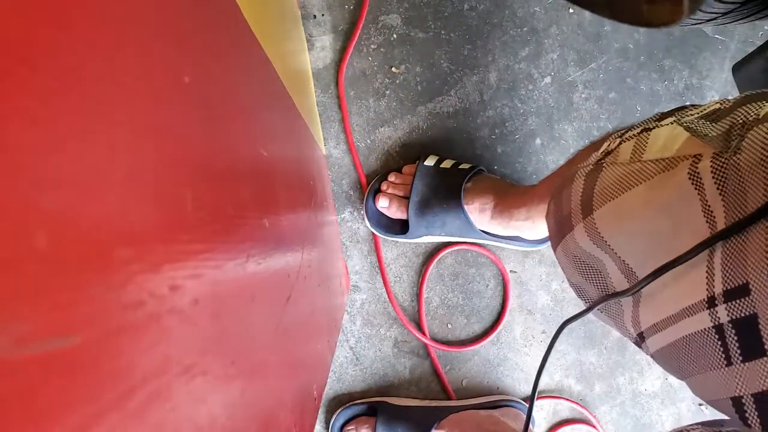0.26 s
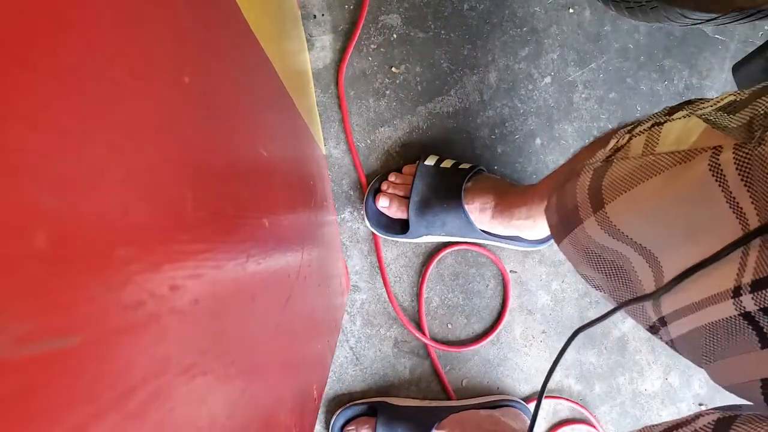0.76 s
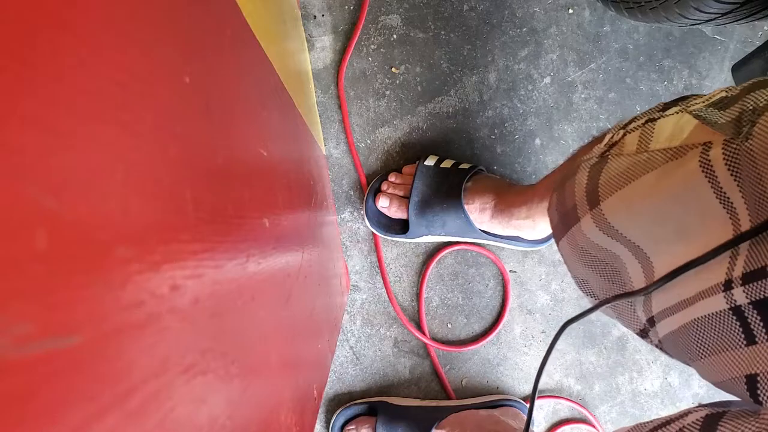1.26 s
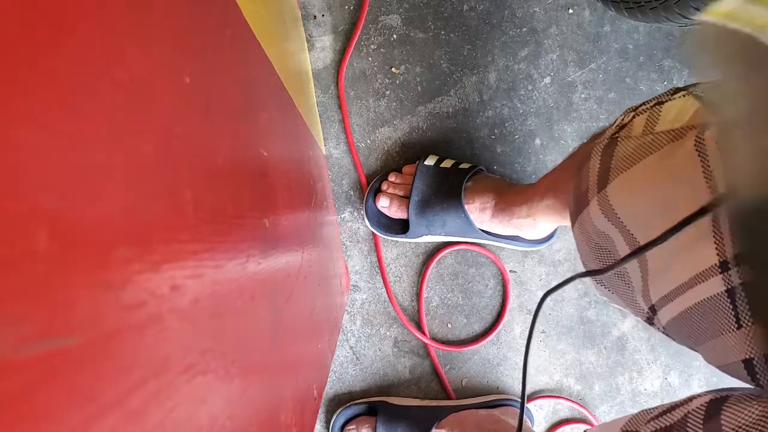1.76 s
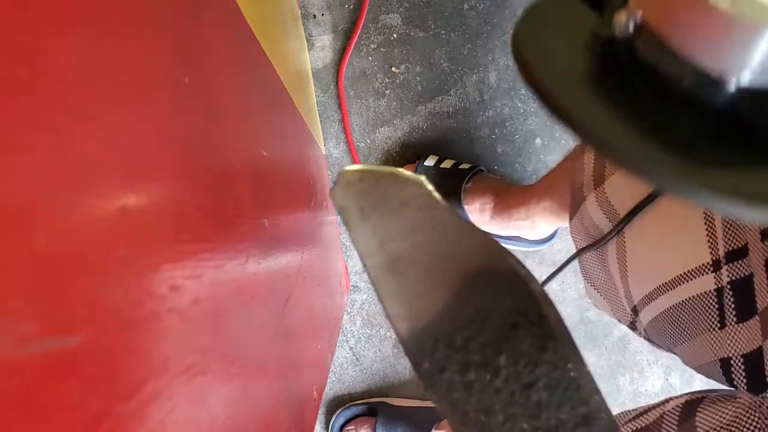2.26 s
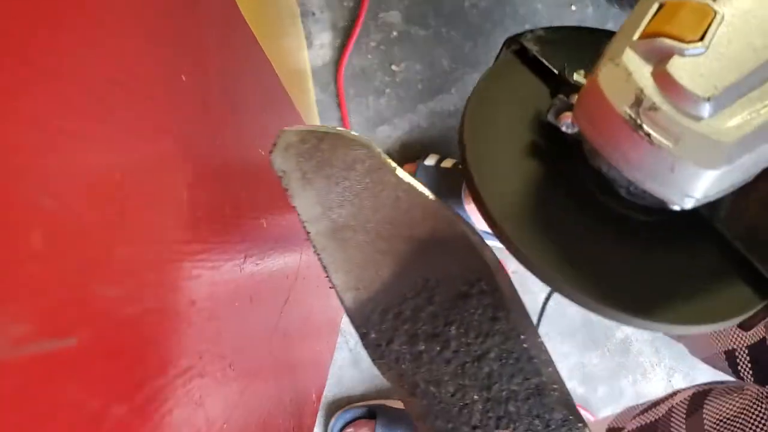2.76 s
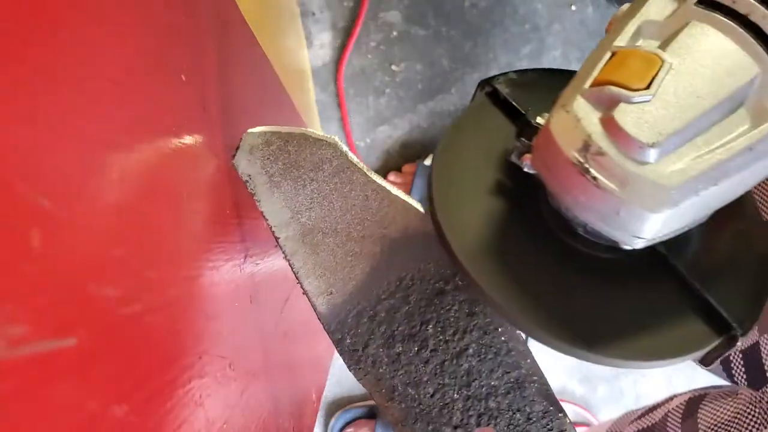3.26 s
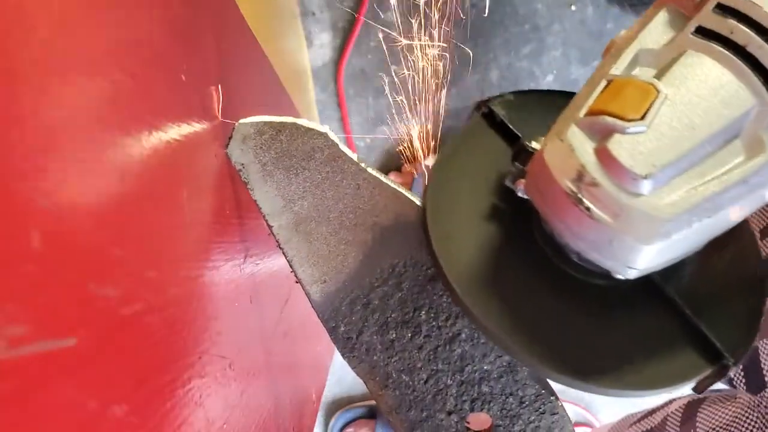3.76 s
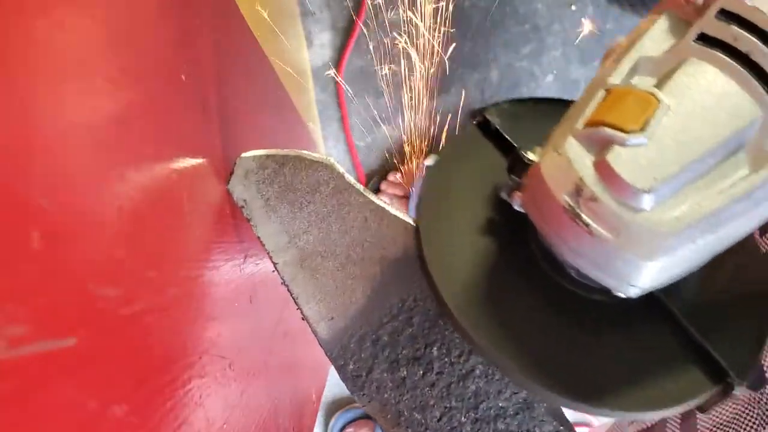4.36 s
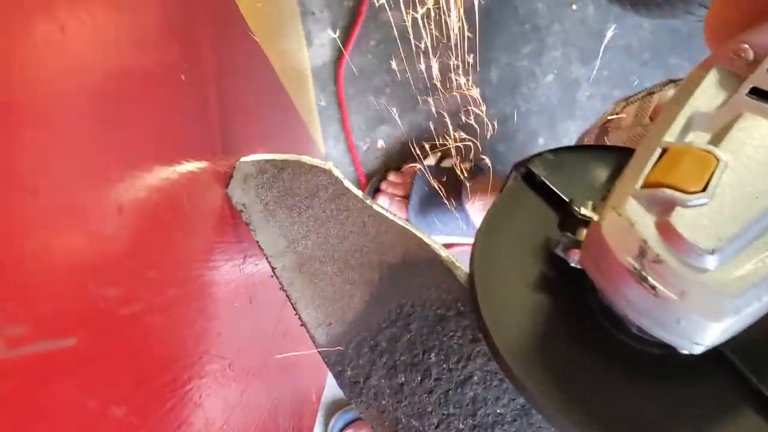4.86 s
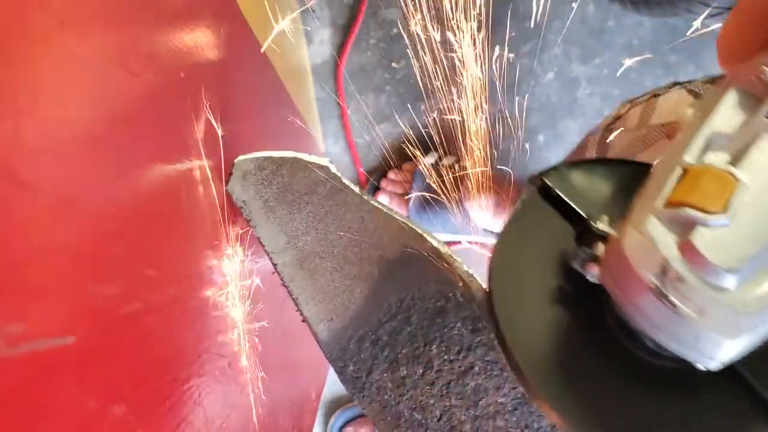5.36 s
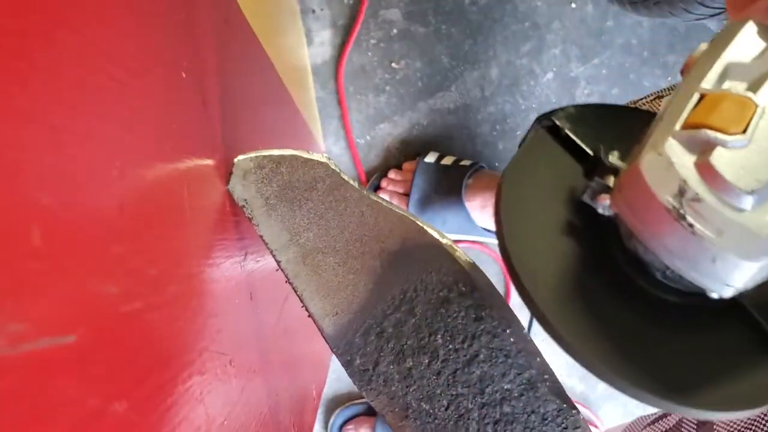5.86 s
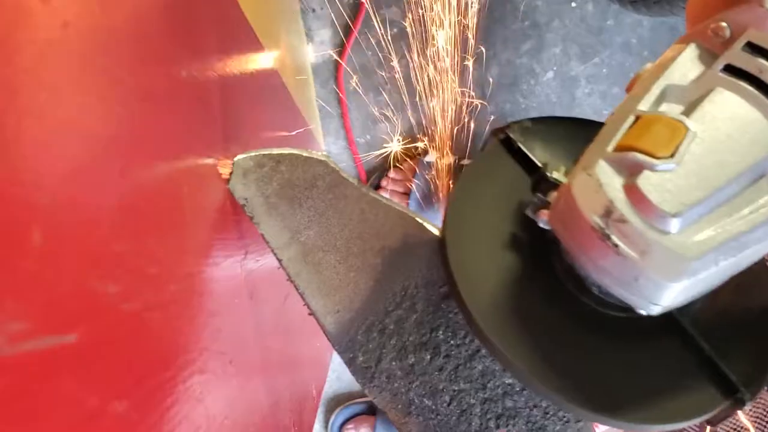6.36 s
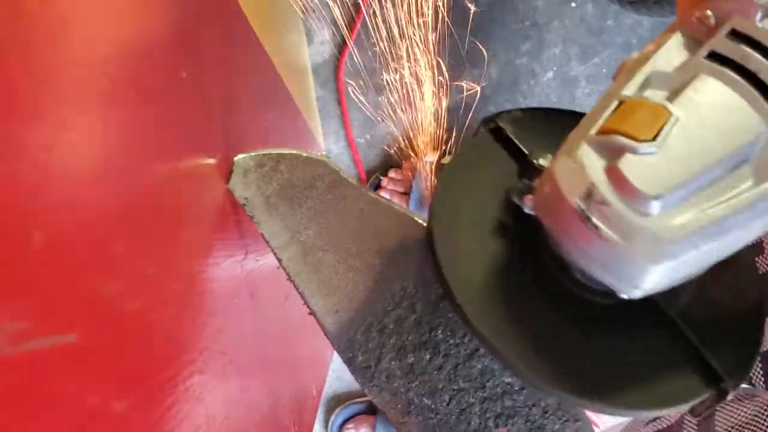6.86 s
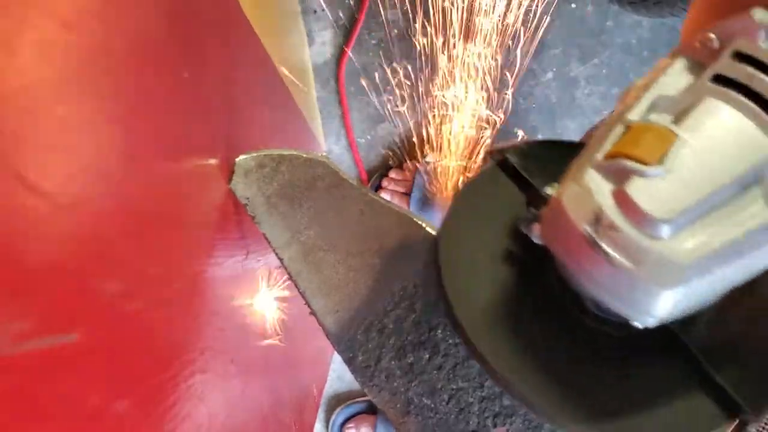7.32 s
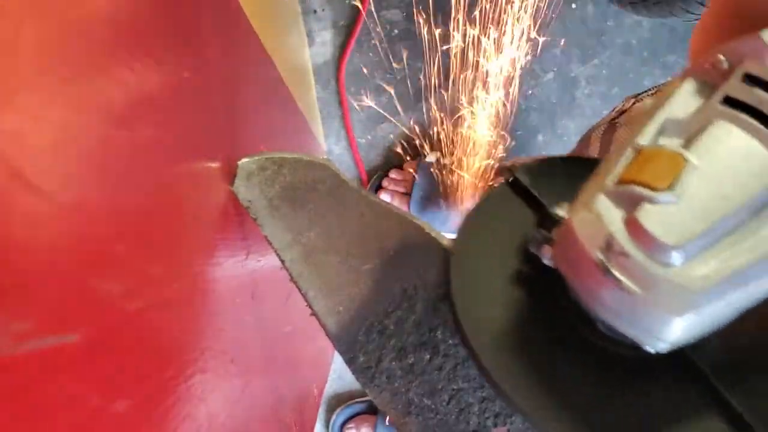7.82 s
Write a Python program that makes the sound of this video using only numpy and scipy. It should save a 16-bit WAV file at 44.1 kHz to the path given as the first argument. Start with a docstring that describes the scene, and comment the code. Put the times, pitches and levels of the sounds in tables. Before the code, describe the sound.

A close stereo pickup in a small hard-walled workshop: about a second of soft rumble, air and ticks, then a corded grinder starts abruptly, growling and clattering as its pitch climbs. It settles into a loud whine with broad hiss. Light touches ring the steel, then a stuttering grind, a brief lift to motor alone, and a second, brighter grind that becomes steadier. Louder on the right.

```python
"""After a quiet second with a sinking whine, an angle grinder spins up and grinds the edge of a steel blade.
The motor is a set of tones that follow its speed, over filtered noise and a rattle of gear knocks.
The high spot of the disc strikes the steel turn by turn and also hops, landing every few turns;
late on it stays down and only strikes. These blows ring a bank of resonances that stand for the blade.
The tool is nearer the right microphone port, and the walls of a small workshop answer it."""
import sys
import numpy as np
from scipy import signal
from scipy.fft import rfft, irfft, next_fast_len
from scipy.io import wavfile
from scipy.ndimage import uniform_filter1d, map_coordinates

SR = 44100
rng = np.random.default_rng(int(sys.argv[2]) if len(sys.argv) > 2 else 0)


def int16_out(signal):
    """Quantize to a 16-bit WAV file."""
    q = np.round(np.clip(np.atleast_2d(signal).T, -1, 1) * 32767)
    wavfile.write(sys.argv[1], SR, q.astype(np.int16))


N = 356769  # length in samples

DISC_PER_TURN = 12 / 37  # disc turns for each turn of the armature, set by the gear teeth

# The motor's speed and the levels of its tones before trims:
# [t/s, armature turns f/Hz, shaft tone level/dB, gear mesh level/dB, commutator level/dB]
MOTOR_RUN = [(1.125, 139.8, -59, -17, -46), (1.3, 244.4, -53, -21, -48), (1.4, 296.8, -41, -26, -50),
             (1.5, 345, -39, -14, -44), (1.6, 371.9, -54, -22, -42), (1.75, 402, -45, -23, -25),
             (1.9, 426.6, -51, -30, -22), (2.15, 452.3, -45, -20, -21), (2.5, 474.4, -44, -23, -28.5),
             (2.9, 487.7, -44.5, -28, -23.5), (3.3, 489.3, -43.5, -28, -24.5),
             (3.6, 493.2, -45.5, -24, -30), (4.5, 494.7, -47, -28.5, -27.5), (5.4, 494, -45, -25.5, -25.5),
             (6.0, 498.6, -44.5, -31, -23), (6.3, 494, -46.5, -26, -29.5), (7.0, 490.8, -47.5, -26, -27.5),
             (7.4, 482.3, -47.5, -21, -23.5), (8.09, 479, -46, -25, -24)]
# Fan and gearbox roar and brush hiss, levels before trims: [t/s, roar level/dB, brush hiss level/dB]
FAN_AND_BRUSH_LEVELS = [(1.13, -15, -42), (1.2, -11.5, -46), (1.28, -15.5, -38), (1.33, -20, -35),
                        (1.6, -22, -38.5), (2.2, -21.5, -32), (3.2, -20, -32.5), (3.7, -23.5, -32),
                        (4.3, -22, -34.5), (4.5, -25, -34.5), (4.93, -21, -30), (5.2, -24.5, -32.5),
                        (5.45, -22, -35), (6.0, -22.5, -35), (6.45, -23.5, -29), (6.95, -23, -32),
                        (8.09, -22, -29.5)]
# Hardest knocks of the loose gear teeth during run-up, before a trim: [t/s, level/dB]
GEAR_KNOCKS = [(1.1302, -2.5), (1.1441, -4), (1.155, -1), (1.181, -4), (1.22, -4), (1.2314, -1),
               (1.2465, -8), (1.298, -4), (1.325, -5), (1.3773, -2.5), (1.4236, -4), (1.4382, -2),
               (1.4657, -5), (1.4914, -1), (1.5127, -6), (1.607, -6), (1.625, -5), (1.6677, -5),
               (1.692, -6), (1.716, -6)]
# Resonances of the steel blade: [f/Hz, basic width/Hz, first stroke level/dB, second stroke level/dB]
BLADE_MODES = [(1480, 110, -13, -34), (1880, 51, -4, -1), (3670, 180, -23, -25), (5980, 226, 2.5, 5.5),
               (6660, 30, -6.5, -3.5), (7130, 130, -21, -7), (8040, 170, -2.5, -18), (8640, 52, 0, -2.5),
               (9780, 200, -3, -2), (10446, 56, 5.5, 1.5), (10720, 114, -1.5, -4), (11500, 170, -25, -12),
               (12900, 120, -7, -20), (13800, 100, -18, -22)]


def amp(db):
    """Turn decibels into an amplitude factor."""
    return 10 ** (np.asarray(db) / 20)


def unit(x):
    """Scale a signal to an rms of 1."""
    return x / np.sqrt(np.mean(x ** 2) + 1e-20)


def along(points, hz):
    """Read a curve of (f/Hz, value) points, with frequency on a log axis."""
    f, v = np.transpose(points)
    return np.interp(np.log(hz + 1), np.log(f + 1), v)


def curves(rows):
    """Draw one curve over the whole scene for each column after the time."""
    s, *cols = np.transpose(rows)
    return [np.interp(np.arange(N) / SR, s, c) for c in cols]


def during(rows):
    """A gate that is 1 from the first row's time to the last row's, with 3 ms ramps outside."""
    t = np.arange(N) / SR
    inside_s = np.minimum(t - rows[0][0], rows[-1][0] - t)
    return np.clip(inside_s / .003 + 1, 0, 1)


def wobble(rate):
    """A smooth random curve through rate random points a second."""
    points = rng.standard_normal(int(N * rate / SR) + 4)
    return map_coordinates(points, [np.arange(N) * rate / SR])


def filtered(x, response):
    """Filter x by multiplying its spectrum with a response of frequency."""
    m = next_fast_len(N + SR // 2)  # spare room lets ringing die out instead of wrapping round
    return irfft(rfft(x, m) * response(np.fft.rfftfreq(m, 1 / SR)), m)[..., :N]


def mode(hz, width, db):
    """The response of one resonance, a part that rings at hz and dies faster the wider it is."""
    return lambda f: amp(db) * 1j * f * width / (hz * hz - f * f + 1j * f * width)


def hiss(spectrum, patchy_db):
    """Coloured noise of rms 1, made from patches in time and frequency of random strength."""
    z = signal.stft(rng.standard_normal(N + 512), nperseg=512)[2]
    field = uniform_filter1d(rng.standard_normal(z.shape), 5, 0)
    patches = uniform_filter1d(field, 10, 1)
    x = signal.istft(z * amp(patchy_db * unit(patches)), nperseg=512)[1][:N]
    return unit(filtered(x, lambda hz: amp(along(spectrum, hz))))


def scrapes(times, gains, length_s, snap=0):
    """At each time a one-sample blow of size snap and a burst of grit noise that peaks after length_s."""
    blows = np.bincount(np.round(np.asarray(times) * SR).astype(int), gains, N)[:N]
    t = np.arange(SR // 50) / SR
    swell_and_fade = t / length_s * np.exp(1 - t / length_s)
    burst = signal.fftconvolve(blows, swell_and_fade)[:N]
    return snap * blows + burst * rng.standard_normal(N)


def far_whine():
    """A faint far sine whose pitch sinks in the quiet before the start."""
    # [t/s, f/Hz, level/dB before wavering]
    whine_path = [(0, 1140, -60), (.3, 1066, -61), (.55, 980, -54), (.8, 926, -52), (1.13, 870, -58)]
    hz, db = curves(whine_path)
    return during(whine_path) * amp(db + 2 * wobble(11.2)) * np.sin(2 * np.pi * np.cumsum(hz) / SR)


def rumble():
    """Low noise, fainter while the tool runs; draught from the disc makes it differ at the two ports."""
    # Shape of the rumble: [f/Hz, relative level/dB]
    rumble_colour = [(15, -48), (25, -40), (54, 5), (103, 0), (317, -12.5), (352, -15.5), (400, -24),
                     (520, -63), (880, -120)]
    # Brief swells of the rumble: [t/s, rise/dB, half length/s]
    swells = [(2.4, 10.5, 0.096), (2.97, 6, .05), (3.81, 7, 0.063), (5.2, 4, .15), (5.661, 0, .08),
              (5.97, 3, .04), (6.18, 8, 0.068), (7.12, 5, .1)]
    quiet_db, running_db, running_waver_db = -42.5, -56.5, 3
    t = np.arange(N) / SR
    running = uniform_filter1d(during(FAN_AND_BRUSH_LEVELS), size=2000)
    level_db = quiet_db + running * (running_db - quiet_db + running_waver_db * wobble(8.1))
    for s, rise_db, half_s in swells:
        level_db += rise_db * np.exp(-((t - s) / half_s) ** 2)
    apart = .15 + 1.3 * during(FAN_AND_BRUSH_LEVELS)  # share that is separate at each port
    common = hiss(rumble_colour, patchy_db=0.0)
    separate = np.array([hiss(rumble_colour, patchy_db=3.0) for _ in "LR"])
    return amp(level_db) * (common + apart * separate) / np.sqrt(1 + apart ** 2 / 2)


def background():
    """Rumble, the far whine and air noise that is unrelated at the two ports."""
    # Shape of the air noise: [f/Hz, relative level/dB]
    air_colour = [(150, -46), (200, -1.5), (390, -9.5), (700, -6.5), (1290, -12), (3000, -17.5),
                  (6300, -28), (11900, -33.5), (14500, -45), (15700, -56)]
    air = np.array([hiss(air_colour, patchy_db=2.1) for _ in "LR"])
    return rumble() + amp(-46) * air + far_whine()


def handling():
    """Handling and switch ticks are short noise bursts; a faint clink of steel is a few fading sines."""
    # Handling and switch, levels before trims: [t/s, level/dB, treble level/dB, time to fall 60 dB/s]
    ticks = [(.418, -27.5, -20, 0.05), (1.025, -33, -28, 0.07), (1.122, -23, -10, 0.017)]
    # The blade touches something: [t/s, level/dB]
    clinks = [(0.621, -43.5)]
    # Tones of the clink: [f/Hz, level/dB, longest time to fall 60 dB/s, capped below]
    clink_modes = [(1980, -10, 1.4), (2550, -2, 0.39), (2616, -20, 5.0), (3068, -18, 5.0), (3790, -1, 0.45),
                   (4070, -5, 0.32), (4630, -26, 5.0), (6500, -6, 0.25), (10570, -1, 0.24),
                   (10800, -12, 0.28)]
    out, t = np.zeros(N + SR), np.arange(SR // 2) / SR
    for s, db, treble_db, t60 in ticks:
        dull, bright = rng.standard_normal((2, len(t))) * amp(-60 * t / t60)
        dull = signal.lfilter(*signal.butter(2, [1200, 6000], "band", fs=SR), dull)
        treble = amp(treble_db - 11) * np.diff(bright, prepend=0)
        out[round(s * SR):][:len(t)] += amp(db + 5.0) * (dull + treble)
    for s, db in clinks:
        ring = np.zeros(len(t))
        for hz, level_db, t60 in clink_modes:
            ring += amp(level_db - 60 * t / min(t60, .28)) * np.sin(2 * np.pi * hz * t)
        touch = amp(-60 * t / .05) * np.diff(rng.standard_normal(len(t) + 1))
        out[round(s * SR):][:len(t)] += amp(db) * (ring + touch)
    return out[:N]


def shaft_tones(turns_hz, angle):
    """Turning parts sound at fixed multiples (orders) of the armature speed, each slightly unsteady."""
    _, shaft_db, mesh_db, bars_db = curves(MOTOR_RUN)

    def tone(order, db, rough):
        level = np.sqrt(2) * amp(db + 1.8 * rough * wobble(26))
        return level * np.sin(order * angle + rough * wobble(60))

    tones = tone(order=1, db=shaft_db + 3.6, rough=0.19)
    tones += (turns_hz / 480) ** 3 * tone(order=12, db=mesh_db + 1.5 * wobble(11), rough=0.9)  # gear mesh
    tones += tone(order=24, db=bars_db + 2.5 * wobble(5), rough=.6)  # commutator bars
    tones += tone(order=25, db=bars_db - 15, rough=.4)
    shake = (turns_hz / 495) ** 4  # unbalance grows fast with speed
    tones += shake * tone(order=DISC_PER_TURN, db=shaft_db - 8, rough=.5)
    tones += shake * tone(order=2 * DISC_PER_TURN, db=shaft_db - 7, rough=.3)
    tones += shake ** 2 * tone(order=3, db=shaft_db + 7, rough=.8)
    tones += np.clip(4 * shake - .6, 0, 1) * tone(order=2.525, db=-37, rough=.35)
    return tones


def fan_and_brushes(angle):
    """Fan and gearbox roar plus brush hiss, both pumped once a disc turn by the disc's unbalance."""
    # Shape of the roar through the housing: [f/Hz, relative level/dB]
    housing_colour = [(90, -39), (150, -38.5), (320, -32.5), (430, -17), (520, -19.5), (600, -14.5),
                      (800, -19.5), (1100, -8.5), (1300, -6.5), (1440, -2.5), (1650, -10.5), (2700, -3.5),
                      (3730, 0.5), (4600, 0.5), (5770, -4.5), (7170, -10.5), (10900, -10), (15000, -54),
                      (22000, -120)]
    # Shape of the brush hiss: [f/Hz, relative level/dB]
    brush_colour = [(4120, -25.5), (7000, -30), (8030, 1.5), (11100, -5), (12000, -1), (12500, -2),
                    (15900, -9)]
    roar_db, brush_db = curves(FAN_AND_BRUSH_LEVELS)
    throb = np.sin(DISC_PER_TURN * angle)
    roar_gain = amp(roar_db + 5.5 + 0.54 * wobble(9) + 0.48 * wobble(60))
    brush_gain = amp(brush_db + 10.5 + 1.5 * wobble(7) + 0.5 * wobble(60))
    roar = roar_gain * (1 + 0.036 * throb) * hiss(housing_colour, patchy_db=0.5)
    brushes = brush_gain * (1 + 0.098 * throb) * hiss(brush_colour, patchy_db=-0.5)
    return roar + brushes


def gear_rattle():
    """Loose gear teeth knock during run-up and ring the resonances of the gearbox."""
    # Gearbox resonances: [f/Hz, width/Hz, level/dB]
    gearbox_modes = [(690, 260, -15), (1270, 400, -6.5), (2200, 760, -4.5), (3040, 240, 0.5),
                     (3710, 270, 0.5), (4340, 230, 6.5), (5150, 140, -1.5), (6130, 280, 0.5),
                     (9770, 470, -2), (12500, 4400, -21)]
    s, db = np.transpose(GEAR_KNOCKS)
    knocks = scrapes(s, amp(db + 2.5), length_s=0.00088, snap=3.5)
    small_s = s[0] + np.cumsum(rng.uniform(.004, .014, 90))  # lighter knocks between the hard ones
    small_db = -2.5 - 8.5 * (small_s - s[0]) + rng.normal(0, 2.4, 90)  # fading by 8.5 dB a second
    knocks += scrapes(small_s, amp(small_db), length_s=0.0011, snap=1.3)

    def gearbox(f):
        return sum((-1) ** k * mode(*m)(f) for k, m in enumerate(gearbox_modes))

    return filtered(knocks, gearbox)


def motor():
    """The speed curve drives the tones, over fan and brush noise, a rough gear growl and gear rattle."""
    turns_hz = curves(MOTOR_RUN)[0]
    angle = 2 * np.pi * np.cumsum(turns_hz) / SR
    tones = shaft_tones(turns_hz, angle)
    noise = fan_and_brushes(angle)
    slack = np.clip((turns_hz - 100) / 330, .3, 1)  # at low speed the fan is weak and the knocks stand out
    # loose teeth smear the mesh tone while the motor pulls hardest
    since_start = np.arange(N) / SR - GEAR_KNOCKS[0][0]
    growl = amp(-19 - 22 * since_start + 4 * wobble(90)) * wobble(900) * np.sin(12 * angle)
    return during(FAN_AND_BRUSH_LEVELS) * (tones + slack * noise + growl) + gear_rattle()


def pings():
    """Light touches ring one low mode of the blade alone, a sine that swells in and fades."""
    # [t/s, level/dB]
    touches = [(2.371, -23), (2.6725, -19), (3.1053, -18), (3.5124, -22)]
    out, t = np.zeros(N + SR), np.arange(SR // 4) / SR
    swell_in = 1 - np.exp(-t / 0.0034)
    ring = swell_in * np.sin(2 * np.pi * BLADE_MODES[1][0] * t)
    for s, db in touches:
        out[round(s * SR):][:len(t)] += amp(db - 60 * t / 0.16) * ring
    return out[:N]


def landings(strike):
    """The hopping disc lands on its high spot after whole turns: times, then gains of low and high ring."""
    # One list a stroke, levels before scatter:
    # [t/s, average disc turns from landing to landing, low ring level/dB, high ring level/dB]
    hop_strokes = [
        [(3.32, 3.5, -7, -13), (3.5, 3, -3.5, -12), (3.56, 1.95, -6.5, -10), (3.68, 3, -5.5, -12),
         (3.82, 3.53, -5, -5), (4.05, 4.4, -10, -3.5), (4.2, 2.8, -7, -6.5), (4.45, 3.2, -5, -6),
         (4.95, 3.7, -9, -9), (5.08, 2.52, -10, -8.5), (5.2, 3.07, -4, -4), (5.27, 1.95, -8.5, -9),
         (5.4, 1.87, -7, -7)],
        [(6.09, 3, -12.5, -7), (6.28, 3, -7, -6), (6.33, 2.46, -10, -5), (6.48, 2.2, -9, -2.5),
         (6.6, 2, -15, -4), (6.8, 2.07, -12, -4.5), (6.94, 2.1, -16, -5.5), (7.02, 2.55, -11, -15)],
    ]
    scatter_db, scatter_s = 2.5, .0005
    rows = []
    for stroke in hop_strokes:
        s = strike[(strike > stroke[0][0] * SR) & (strike < stroke[-1][0] * SR)]
        turns, *ring_db = (c[s] for c in curves(stroke))
        lands = np.diff(np.floor(np.cumsum(1 / turns)), prepend=-1) > 0
        chance = rng.standard_normal((len(s), 3))
        times = s / SR + scatter_s * chance[:, 0]
        gains = amp(np.c_[ring_db].T + scatter_db * chance[:, 1:])
        rows.append(np.c_[times, gains][lands])
    return np.vstack(rows).T


def blade():
    """Hops and once-a-turn strikes ring the blade; the contact wanders, so each mode swells on its own."""
    # Contact of disc and edge, one list a stroke, levels before trims:
    # [t/s, low ring level/dB, high ring level/dB]
    press_strokes = [
        [(3.3, -25, -29), (3.41, -27, -31), (3.54, -25, -27), (3.65, -33, -19), (3.88, -25, -30),
         (4.07, -23, -30), (4.3, -30, -14), (4.78, -31, -32), (5.22, -31, -29), (5.42, -28, -31)],
        [(6.3, -25, -27), (6.538, -20, -27), (6.702, -27, -18), (6.868, -28, -25), (7.008, -21, -15),
         (7.142, -21.5, -17), (7.336, -26, -15), (7.804, -21.5, -18), (8.09, -26, -20.5)],
    ]
    high_from_hz = 6400  # modes above this follow the high ring
    t = np.arange(N) / SR
    disc_turns = np.cumsum(curves(MOTOR_RUN)[0] * DISC_PER_TURN) / SR
    strike = np.flatnonzero(np.diff(np.floor(disc_turns)))  # samples where the high spot comes round
    scatter = amp(2 * rng.standard_normal(len(strike)))
    steady = np.clip((t - 6.75) / 0.26, .33, 1)  # late on the disc stays down instead of bouncing
    landing_s, *landing_gain = landings(strike)
    drive = []
    for ring in range(2):  # low, high
        press = steady * sum(during(rows) * amp(curves(rows)[ring]) for rows in press_strokes)
        turns = scrapes(strike / SR, scatter * press[strike], length_s=0.00071, snap=10.45)
        grit = 0.22 * press * rng.standard_normal(N)
        hops = scrapes(landing_s, landing_gain[ring], length_s=0.0009, snap=23.2)
        drive.append(amp(14.5) * (turns + grit) + hops)

    def soft_mode(hz, width):
        """Contact lasts a while, so two resonances in a row make the ring swell in."""
        return lambda f: mode(hz, 1.5 * width, 0)(f) * mode(hz, 4 * width, 0)(f)

    second_stroke = t > press_strokes[1][0][0] - .5
    ringing = np.zeros(N)
    for hz, width, first_db, second_db in BLADE_MODES:
        high = hz > high_from_hz
        swell_db = (1.8 if high else 1) * wobble(5)
        gain = amp(np.where(second_stroke, second_db, first_db) + swell_db)
        ringing += filtered(gain * drive[int(high)], soft_mode(hz, width))
    bare_contact = filtered(drive[1], lambda f: f / (f + 3000))  # the blows themselves, bass reduced
    return ringing + amp(-48) * bare_contact


def walls(x):
    """Each frequency of the room's answer dies at its own speed; the answer is weak in the bass."""
    # [f/Hz, time to fall 60 dB/s]
    wall_decay = [(200, 0.31), (2000, 1), (12000, 0.017)]
    hz, t, z = signal.stft(rng.standard_normal((2, SR // 3)), SR, nperseg=256)
    kept = (hz ** 2 / (hz ** 2 + 1500 ** 2))[:, None]
    fade = amp(-60 * t / along(wall_decay, hz)[:, None])
    tail = signal.istft(kept * z * fade, SR, nperseg=256)[1]
    delayed = np.pad(x, (150, 0))[None]  # the answer starts 150 samples late
    return signal.fftconvolve(delayed, tail / np.linalg.norm(tail[0]), axes=1)[:, :N]


def wandering(x, frames):
    """The same sound from other moving surfaces: each band's phase drifts at random."""
    z = signal.stft(x, nperseg=128)[2]
    field = uniform_filter1d(rng.standard_normal((2, *z.shape)), frames, 2)
    turn = field[0] + 1j * field[1]
    return signal.istft(z * turn / np.abs(turn), nperseg=128)[1][:N]


def scene():
    """The left port hears the tool with its own delay, weaker, and partly from far side and surfaces."""
    # Left port, share of the amplitude that comes directly: [f/Hz, share]
    direct_share = [(100, .95), (300, .8), (700, .78), (1400, .84), (3000, .54), (8000, .55), (13000, .25)]
    # The left port is shadowed: [f/Hz, level/dB]
    left_shadow = [(60, -2.5), (110, -1.5), (200, -1.0), (380, -7.0), (700, -4.0), (1290, -4.5),
                   (2380, -4.0), (4400, -7.5), (8120, -8.0), (15000, -7.0)]
    # Longer path round the body to the left port: [f/Hz, phase lead/rad]
    left_phase = [(0, 0), (600, 5.4), (1030, 3.2), (1810, 1.8), (3450, -5.7), (3700, -5.1), (4050, -8.9),
                  (5680, -13.2), (7750, -21.7), (10100, -23.7), (11300, -33.0), (13800, -35.7),
                  (14600, -43.6), (16600, -44.2)]
    tool = motor() + blade() + pings() + handling()
    far_side = 1.3 * wandering(tool, frames=12)

    def share(hz):
        return along(direct_share, hz)

    def round_the_body(hz):
        phase = np.interp(hz, *np.transpose(left_phase))
        return amp(along(left_shadow, hz)) * np.exp(1j * phase)

    left = filtered(tool, share) + filtered(far_side, lambda hz: np.sqrt(1 - share(hz) ** 2))
    left, right = np.array([left, tool]) + amp(-12) * walls(tool)
    return np.array([filtered(left, round_the_body), right]) + background()


def record(dry):
    """The loudest peaks clip softly; nothing is kept above the band limit."""
    top_hz = 15750
    clipped = dry / (1 + np.abs(dry / .98) ** 8) ** (1 / 8)
    return filtered(clipped, lambda hz: hz < top_hz)


dry = scene()
out = record(dry)
int16_out(out)
```